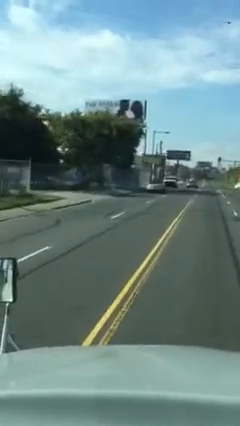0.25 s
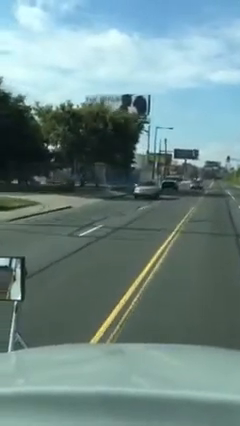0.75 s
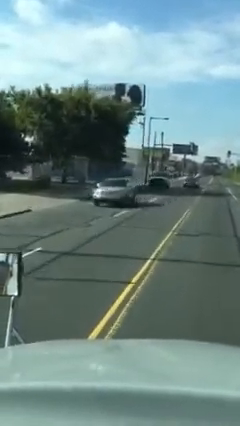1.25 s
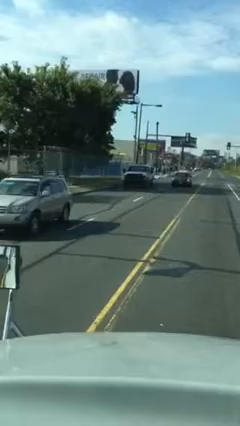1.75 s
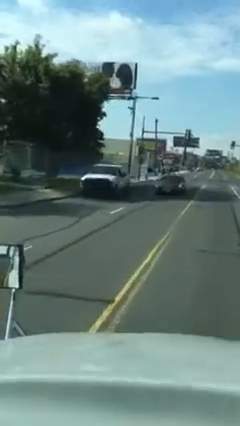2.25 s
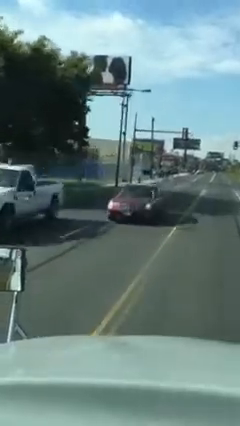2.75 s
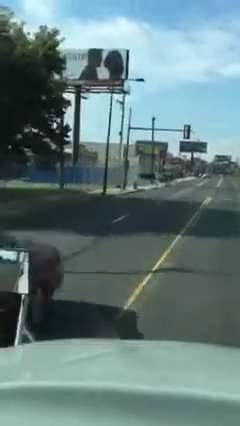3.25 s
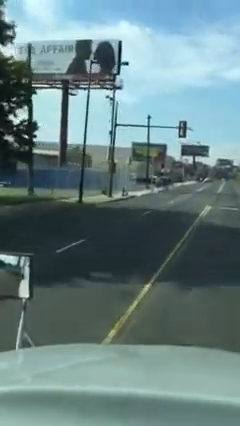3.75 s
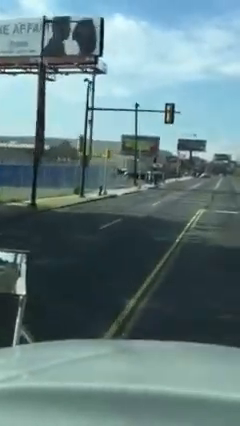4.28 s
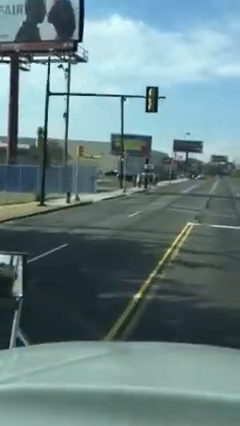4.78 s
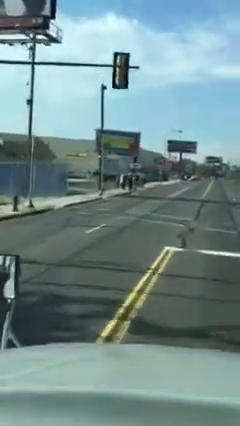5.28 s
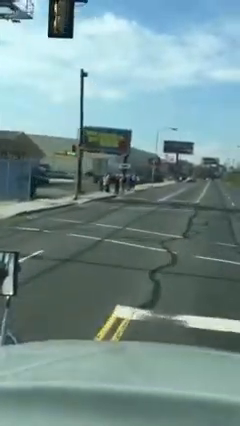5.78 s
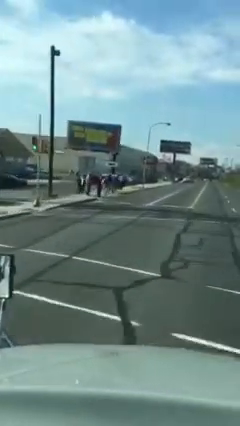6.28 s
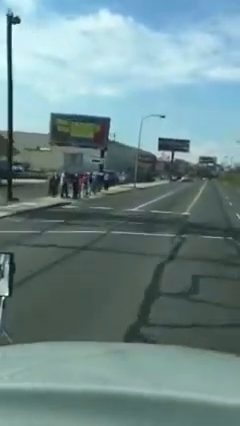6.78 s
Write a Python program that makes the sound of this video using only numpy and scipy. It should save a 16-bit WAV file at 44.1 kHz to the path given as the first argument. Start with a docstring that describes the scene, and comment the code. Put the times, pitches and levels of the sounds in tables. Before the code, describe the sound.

Engine drone and tyre roar fill a moving truck cab, followed by a loud, steady air horn echoing off the street.

```python
"""Air horn from a truck cab

One microphone behind the windscreen of a diesel truck on a city road. Close by, the engine drones, the
cab rumbles and rattles and the tyres roar through its panels; oncoming cars swish past outside. Then the
air horn sounds one long blast. Its echoes from the roadside come back Doppler-shifted, sharp from ahead
and flat from behind, and beat against the steady note."""
import sys
import numpy as np
from scipy import signal
from scipy.fft import rfft, irfft, next_fast_len
from scipy.io import wavfile

SR = 44100
rng = np.random.default_rng(int(sys.argv[2]) if len(sys.argv) > 2 else 0)


def inscribe(sig):
    """Save sig as 16-bit PCM at rate SR to the path in sys.argv[1].

    A 1-D sig is mono; a 2-D sig holds one channel per row.
    Samples are clipped to [-1, 1] before scaling.
    """
    pcm = np.round(np.clip(np.atleast_2d(sig).T, -1, 1) * 32767)
    wavfile.write(sys.argv[1], SR, pcm.astype(np.int16))


N = 310023
TIME = np.arange(N) / SR
TRUCK_M_PER_S, SOUND_M_PER_S = 10, 343
HORN_START_S, HORN_HZ = 5.458, 413.45   # the valve opens and stays open
CUTOFF_HZ = 15400

# The driver's pushes on the pedal. Each row: start in seconds, end in seconds, depth from 0 to 1.
PEDAL_PUSHES = [(0.0, 3.2, 0.89), (3.5, 4.2, 0.28), (4.9, 5.52, 0.4)]
# Engine boom in the cab. Each row: multiple of the cycle rate, rms dB coasting, rms dB pulling.
ENGINE_ORDERS = [(3, -37, -40.5), (6, -42, -48), (8, -35.5, -58), (9, -35.5, -31.5), (10, -42, -33.5),
                 (11, -49, -42), (12, -47, -41.5)]
# Rumble of the cab shell around the microphone. Each row: frequency in Hz, relative level in dB.
RUMBLE_SPECTRUM = [(20, -13), (32, -16), (44, -5), (70, 0.5), (100, -0.5), (135, -0.5), (170, -2),
                   (210, -9), (260, -6.5), (310, -7), (360, -18.5), (480, -20.5), (900, -70.5)]
# Tyre roar and diesel clatter. Each row: frequency in Hz, relative level in dB.
ROAR_SPECTRUM = [(200, -25.5), (380, -2), (700, 1), (1000, -2), (1450, -7), (1750, -7.5), (2100, -7),
                 (2800, -15), (4300, -29), (5200, -31), (6600, -38.5), (7600, -43), (9400, -40),
                 (10500, -58), (15500, -61)]
# Resonances and notches of the cab panels. Each row: centre in Hz, width in Hz, lift in dB.
PANEL_RESONANCES = [(456, 25, -4), (544.5, 47, 9.5), (850, 260, 2), (1460, 150, 6), (1536, 22, -4),
                    (1884, 60, -7), (1996, 67, 5.5), (3020, 160, -2.5), (3400, 160, 3.5), (3830, 90, 5),
                    (4460, 120, 7.5), (5000, 300, -7), (5600, 180, 4.5), (6600, 400, 4)]
# Bounces over road seams. Each row: time in seconds, pitch in Hz, peak in dB, half duration in seconds.
SEAM_BUMPS = [(1.203, 65, -24.5, 0.051), (2.726, 68, -27.5, 0.14), (3.808, 86, -13, 0.0061),
              (4.102, 45.4, -30, 0.26), (5, 65.6, -25.5, 0.09), (5.387, 70.8, -21, 0.076)]
# Loose trim, close by. Each row: frequency in Hz, relative level in dB.
TRIM_SPECTRUM = [(1500, -14), (2600, 0.5), (3400, 5.5), (4400, -1.5), (5200, -6.5), (6700, -8.5),
                 (8000, -19), (9500, -18), (11000, -24.5), (15500, -37)]
# The trim's main buzzes. Each row: time in seconds, level in dB.
TRIM_BUZZES = [(2.51, -52), (3.59, -43), (4.65, -59), (4.72, -63)]
# Oncoming cars. Each row: nearest moment in seconds, level in dB, half duration in seconds.
CAR_PASSES = [(1.62, -47.5, 0.3), (2.562, -38, 0.2), (2.952, -46, .06), (3.3, -41.5, 0.68),
              (3.536, -37, 0.068), (3.66, -50.5, .09)]
# Their tyres, heard from the cab. Each row: frequency in Hz, relative level in dB.
SWISH_SPECTRUM = [(300, -4), (900, 9), (1500, 8), (2500, -2.5), (4000, -9), (6500, -13.5), (8000, -21),
                  (11000, -28), (15500, -35)]
# Crisp hiss of tyres at very close range. Each row: frequency in Hz, relative level in dB.
CRISP_SPECTRUM = [(3000, -18), (6000, -2), (11500, 0), (15500, -5)]
# The dull rush behind the closest car. Each row: frequency in Hz, relative level in dB.
WAKE_SPECTRUM = [(400, -30), (900, -3.0), (1300, 0.5), (2000, -15.5), (5000, -28.5), (12000, -48)]
# A lone tick. Each row: start in seconds, peak in dB.
TICKS = [(1.804, -18.5)]
# Thin squeaks. Each row: time in seconds, pitch in Hz, level in dB.
SQUEAKS = [(3.71, 11250, -59), (3.838, 11100, -55), (4.425, 3400, -49), (4.44, 6750, -60)]
# The horn's partials through the cab wall. Each row: frequency in Hz, relative level in dB.
HORN_SPECTRUM = [(414, -6), (827, -4.5), (1241, -1), (1654, -3), (2068, -8.5), (2482, -22), (3308, -22),
                 (3724, -22.5), (4135, -21), (4700, -25.5), (6616, -24.5), (7800, -32.5), (9100, -35.5),
                 (15500, -47.5)]
# Overtones flaring up. Each row: time in seconds, partial number, lift in dB, half duration in seconds.
HORN_FLARES = [(5.507, 4, 7, 0.013), (5.64, 6, 13.5, 0.12), (5.634, 9, 7.5, 0.073), (6.0, 7, 10, 0.035),
               (6.28, 10, 7.5, 0.07), (6.6, 6, 11, .1), (6.63, 8, 9.5, 0.15), (6.693, 4, 6, 0.13),
               (6.95, 7, 11, 0.2)]
# Air rasping at the horn's mouth. Each row: frequency in Hz, relative level in dB.
RASP_SPECTRUM = [(2000, -25), (2800, 10), (3800, 1), (4700, -5.5), (6300, -11), (7600, -18), (9200, -3),
                 (10400, -23), (11600, -6), (15500, -16)]
# Notches in the haze of rasp and echoes. Each row: centre in Hz, width in Hz, lift in dB.
HAZE_NOTCHES = [(1380, 100, -4), (1800, 68, -7), (2280, 105, -11), (3000, 100, -9), (4830, 91, -5)]
# Colour of the roadside echoes against the direct note. Each row: frequency in Hz, lift in dB.
ECHO_COLOUR = [(414, -18.5), (827, -13.5), (1241, -11.5), (1654, -6.5), (2068, -3.5), (2482, 4.5),
               (3500, -1), (5500, 1.5), (8000, 4.5), (15500, 1)]
# Large street fronts. Each row: metres ahead as the horn starts, metres to the side, relative gain in dB.
FACADES = [(-34.5, 31, 10), (9.5, 18, -7)]


def from_db(db):
    """Decibels to gain."""
    return 10 ** (np.asarray(db) / 20)


def rms_one(x):
    """Scale to an rms of 1."""
    return x / np.sqrt(np.mean(x ** 2) + 1e-20)


def at_hz(spectrum, hz):
    """Read a spectrum's level in dB on a log-frequency axis."""
    points_hz, level = np.transpose(spectrum)
    return np.interp(np.log(np.maximum(hz, 1)), np.log(points_hz), level)


def swell(peak_s, half_s):
    """A bell-shaped rise and fall."""
    return np.exp(-((TIME - peak_s) / half_s) ** 2 / 2)


def drift(rate_hz):
    """A smooth random wander with a spread of 1, mostly slower than rate_hz."""
    pole = np.exp(-200 * np.pi * rate_hz / SR)
    steps = rng.standard_normal(N // 100 + 1002)   # one per 100 samples
    slow = signal.lfilter([1], [1, -2 * pole, pole * pole], steps)[1000:]
    return np.interp(np.arange(N) / 100, np.arange(len(slow)), rms_one(slow))


def coloured(x, spectrum=((20, 0), (20000, 0)), resonances=()):
    """Give a sound a broad colour, lifted or cut at each resonance."""
    size = next_fast_len(N + SR // 10)
    hz = np.arange(size // 2 + 1) * SR / size
    lift_db = sum(db / (1 + (2 * (hz - centre) / width) ** 2) for centre, width, db in resonances)
    return irfft(rfft(x, size) * from_db(at_hz(spectrum, hz) + lift_db) * (hz > 10), size)[:N]


def noise(spectrum, resonances=()):
    """Coloured noise with an rms of 1."""
    return rms_one(coloured(rng.standard_normal(N), spectrum, resonances))


def engine_load(ease_s=0.095):
    """The diesel takes up and drops its load, 0 to 1, gradually with each push of the pedal."""
    return sum(depth * (np.tanh((TIME - down) / ease_s) - np.tanh((TIME - up) / ease_s)) / 2
               for down, up, depth in PEDAL_PUSHES)


def engine_cycles(start_hz=14.42, rise_hz_per_s=0.18):
    """Four-stroke cycles turned so far: the engine gathers speed during the first push, then holds it."""
    return np.cumsum(start_hz + rise_hz_per_s * np.minimum(TIME, PEDAL_PUSHES[0][1])) / SR


def engine(cycle, load, unsteady_db=2.0):
    """The diesel's low orders boom in the cab; the load shifts the weight between them."""
    drone = 0
    for order, coasting_db, pulling_db in ENGINE_ORDERS:
        phase = 2 * np.pi * (order * cycle + rng.random()) + 0.15 * drift(2.8)
        level_db = coasting_db + load * (pulling_db - coasting_db) + unsteady_db * drift(4.4)
        drone += np.sqrt(2) * from_db(level_db) * np.sin(phase)
    return drone


def cab_shell(rumble_db=-27):
    """The shell rumbles all round the microphone and bounces over seams in the road."""
    bounce = sum(from_db(db) * swell(s, half) * np.sin(2 * np.pi * hz * (TIME - s))
                 for s, hz, db, half in SEAM_BUMPS)
    return from_db(rumble_db) * noise(RUMBLE_SPECTRUM) + bounce


def roar(cycle, load, coasting_db=-36, load_lift_db=2.0, clatter=0.073, lope=0.024):
    """Tyres and diesel clatter come through the panels, louder under load."""
    firing = np.cos(2 * np.pi * 6 * cycle)
    pulsing = 1 + clatter * firing + lope * np.cos(2 * np.pi * cycle)   # six cylinders, not quite equal
    return from_db(coasting_db + load_lift_db * load) * pulsing * noise(ROAR_SPECTRUM, PANEL_RESONANCES)


def loose_trim(jiggle_db=-63, faint_db=-61, faint_per_s=2.0, buzz_half_s=0.016):
    """Trim near the microphone jiggles all the time and now and then buzzes."""
    jiggle = from_db(jiggle_db + 3 * drift(22))
    faint = [(s, faint_db) for s in np.cumsum(rng.exponential(1, size=30)) / faint_per_s]
    buzzes = sum(from_db(db) * swell(s, buzz_half_s) for s, db in TRIM_BUZZES + faint if s < TIME[-1])
    return (jiggle + buzzes) * noise(TRIM_SPECTRUM)


def oncoming_cars(crisp_db=-57, wake_s=3.64, wake_half_s=0.11, wake_db=-32.5):
    """Tyre hiss swells as each car draws level, crisp at close range; the closest trails a dull rush."""
    power = sum(from_db(db) ** 2 / (1 + ((TIME - s) / half) ** 2) ** 2 for s, db, half in CAR_PASSES)
    crisp = from_db(crisp_db) * (power / power.max()) ** 2 * noise(CRISP_SPECTRUM)
    swish = np.sqrt(power) * noise(SWISH_SPECTRUM)
    wake = from_db(wake_db) / (1 + ((TIME - wake_s) / wake_half_s) ** 2) * noise(WAKE_SPECTRUM)
    return swish + crisp + wake


def tick(decay_s=0.0004):
    """A dry tick: a sudden step that dies at once."""
    return sum(from_db(db) * (TIME >= s) * np.exp(-np.abs(TIME - s) / decay_s) for s, db in TICKS)


def squeaks(half_s=0.015, roughness_hz=130):
    """Brief high tones whose level flickers."""
    return sum(from_db(db) * swell(s, half_s) * drift(roughness_hz) * np.sin(2 * np.pi * hz * TIME)
               for s, hz, db in SQUEAKS)


def air_horn(drive_db=-21.5, attack_s=0.0094, sharp_hz=5.5, settle_s=0.045, wander=0.00092,
             jitter_rad=0.015, bloom_s=0.00088, build_s=0.013, rasp_gain_db=-21.5, chop=0.96):
    """A diaphragm chops air into pulses; returns the note in the cab and the one sent down the street."""
    on = TIME > HORN_START_S
    age = TIME[on] - HORN_START_S
    pressure = from_db(drive_db) * (1 - np.exp(-age / attack_s))
    pitch = HORN_HZ + sharp_hz * np.exp(-age / settle_s)
    phase = 2 * np.pi * np.cumsum(pitch * (1 + wander * drift(26)[on])) / SR
    phase += jitter_rad * drift(110)[on]   # early and late pulses fray the high partials
    direct, outward = np.zeros((2, N))
    for k in range(1, int(CUTOFF_HZ / HORN_HZ) + 1):
        hz = k * HORN_HZ
        # low partials build up in the bell; the pulses sharpen as pressure rises
        onset = 1 - np.exp(-age / (bloom_s * k + build_s / k))
        amplitude = np.sqrt(2) * onset * pressure * from_db(at_hz(HORN_SPECTRUM, hz))
        partial = -amplitude * np.cos(k * phase + 0.25 * k * rng.normal())
        flare_db = sum(db * swell(s, half)[on] for s, number, db, half in HORN_FLARES if number == k)
        flutter_db = min(k / 2, 4) * drift(11.7)[on]   # short waves fade most on their way into the cab
        direct[on] += partial * from_db(flare_db + flutter_db)
        outward[on] += partial * from_db(at_hz(ECHO_COLOUR, hz))
    puffs = (1 + chop * np.cos(phase)) * (1 - np.exp(-age / 0.025))   # turbulent air with every pulse
    direct[on] += pressure * from_db(rasp_gain_db) * puffs * noise(RASP_SPECTRUM, HAZE_NOTCHES)[on]
    return direct, outward


def street_echoes(outward, count=140, behind_m=42, ahead_m=55, near_m=7, far_m=26,
                  glass_hz=2000, facade_hz=1560, facade_width_hz=220):
    """Poles, kerbs and walls return the horn; each path shortens or lengthens as the truck rolls on."""
    t = TIME[TIME > HORN_START_S]
    travelled_m = TRUCK_M_PER_S * (t - t[0])
    note = signal.resample_poly(outward[-len(t):], 4, 1)   # oversampled for smoothly sliding delays
    note_t = np.linspace(t[0], t[-1], len(note))

    def echo(ahead, side):
        """One reflector's round trip, weaker with distance, split between windscreen and side window."""
        distance = np.hypot(ahead - travelled_m, side)
        facing = (ahead - travelled_m) / distance
        delayed = np.interp(t - 2 * distance / SOUND_M_PER_S, note_t, note, left=0)
        returned = 10 / distance * from_db(-facing) * delayed   # slightly weaker from ahead
        front_share = np.clip(2 * facing + 0.5, 0, 1)
        return returned * np.array([front_share, 1 - front_share])

    places = zip(np.linspace(-behind_m, ahead_m, count), rng.uniform(near_m, far_m, count))
    windscreen, window = sum(echo(ahead, side) for ahead, side in places)
    # the glass dulls echoes from ahead
    muffled = signal.sosfilt(signal.butter(2, glass_hz, fs=SR, output="sos"), windscreen)
    clutter = np.std(note) * rms_one(window + muffled)
    walls = sum(from_db(db) * echo(ahead, side).sum(axis=0) for ahead, side, db in FACADES)
    # far walls return mainly the horn's middle
    walls = signal.lfilter(*signal.iirpeak(facade_hz, facade_hz / facade_width_hz, fs=SR), walls)
    echoes = np.concatenate([np.zeros(N - len(t)), clutter + walls])
    return coloured(echoes, resonances=HAZE_NOTCHES)


def scene():
    """Everything that reaches the microphone behind the windscreen, in mono."""
    cycle, load = engine_cycles(), engine_load()
    horn, outward = air_horn()
    driving = engine(cycle, load) + cab_shell() + roar(cycle, load) + oncoming_cars()
    small_sounds = loose_trim() + tick() + squeaks()
    return (driving + small_sounds + horn + street_echoes(outward))[None]


def record(dry, threshold_db=-19.5, squeeze=0.5, response_s=0.067):
    """The recorder's gain control turns everything down while it is loud; the top is cut steeply."""
    pole = np.exp(-1 / (response_s * SR))
    level_db = 10 * np.log10(signal.lfilter([1 - pole], [1, -pole], dry ** 2) + 1e-12)
    held = dry * from_db(-squeeze * np.maximum(level_db - threshold_db, 0))
    return signal.sosfilt(signal.ellip(10, 0.1, 80, CUTOFF_HZ, fs=SR, output="sos"), held)


dry = scene()
out = record(dry)
inscribe(out)
```